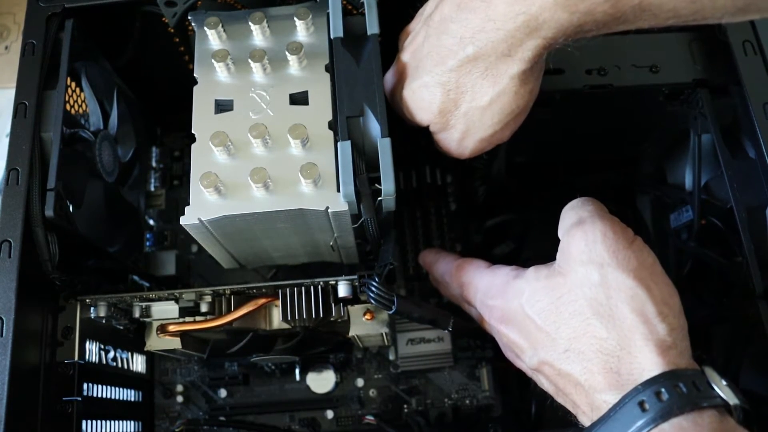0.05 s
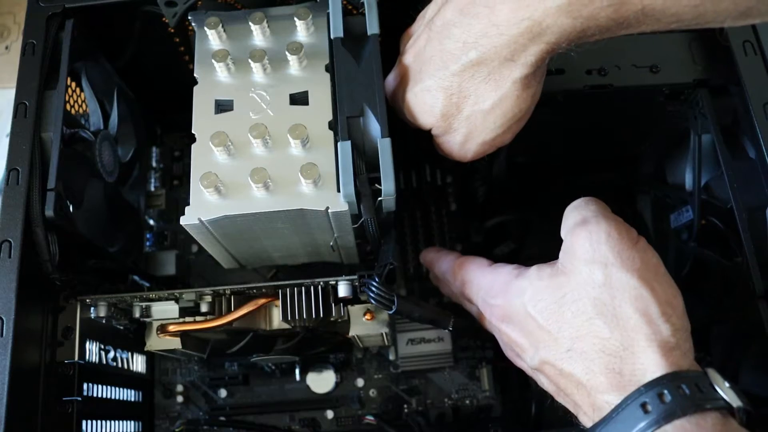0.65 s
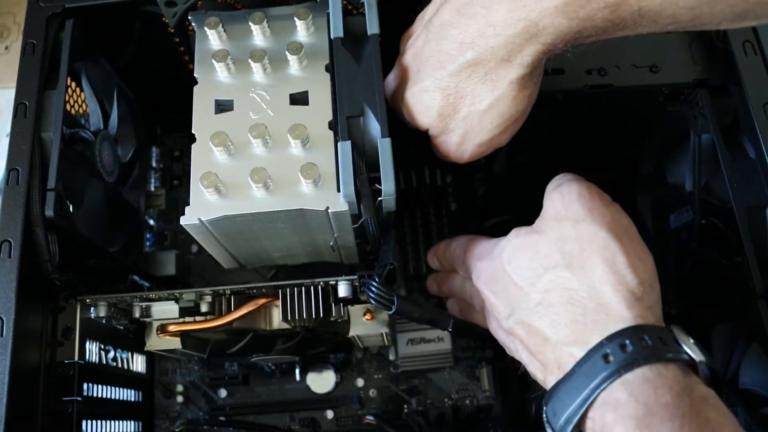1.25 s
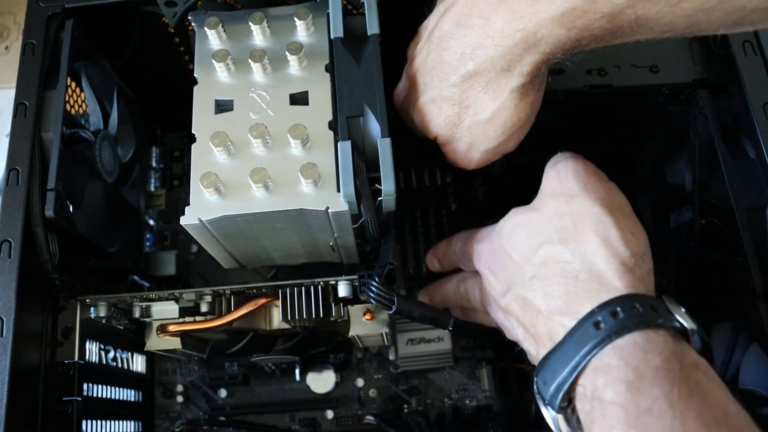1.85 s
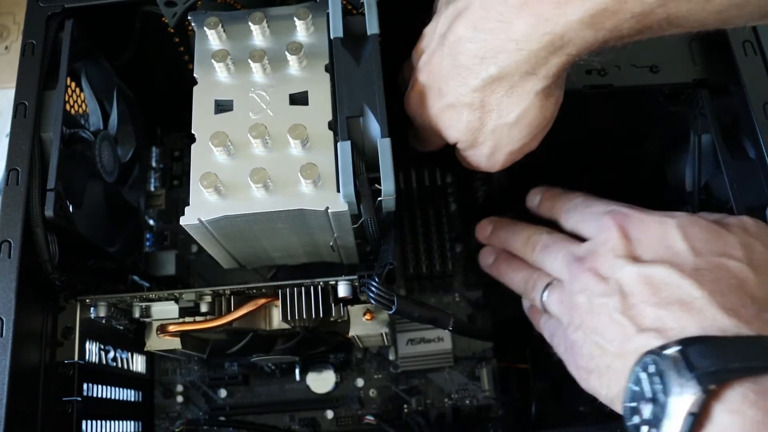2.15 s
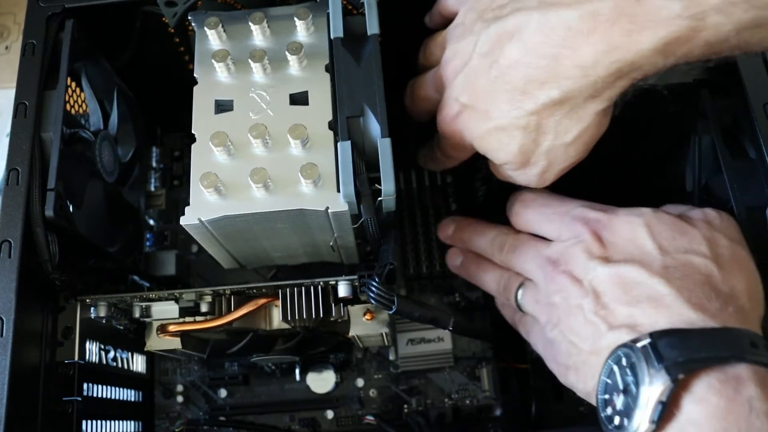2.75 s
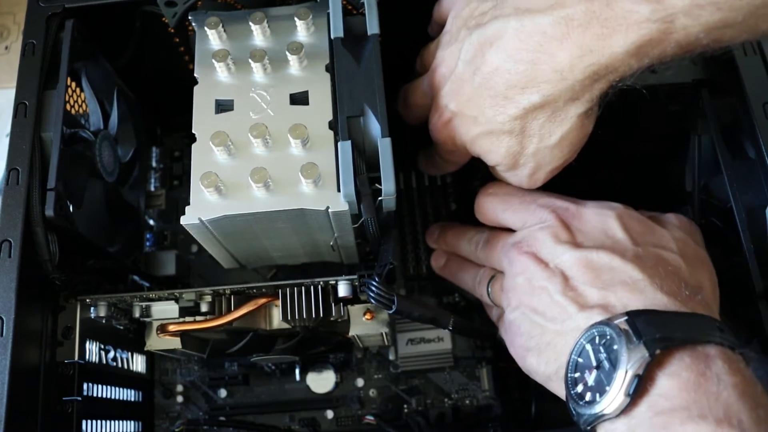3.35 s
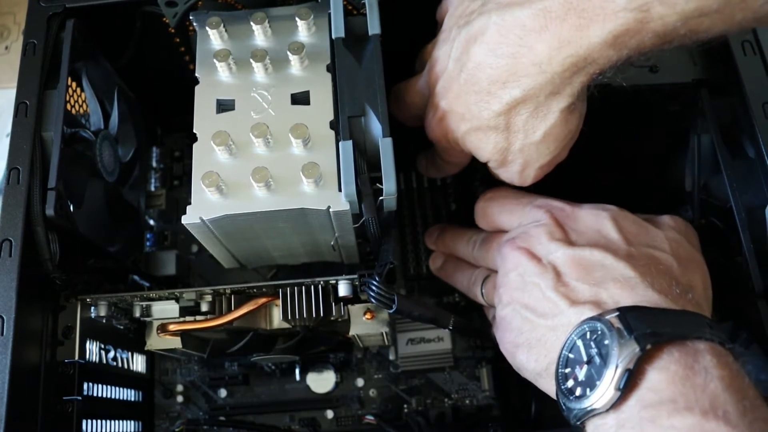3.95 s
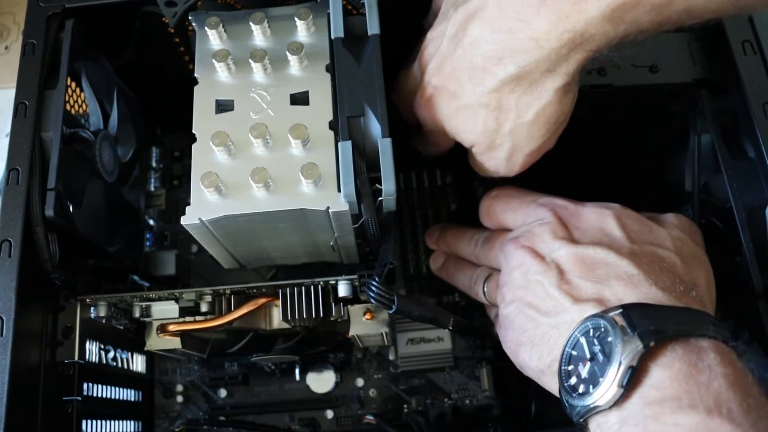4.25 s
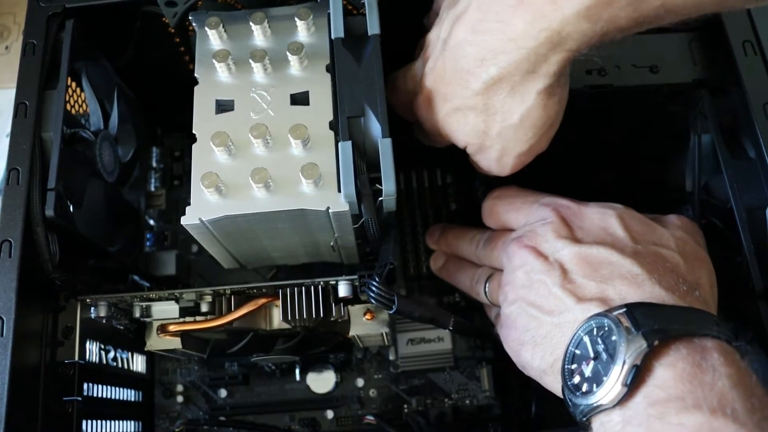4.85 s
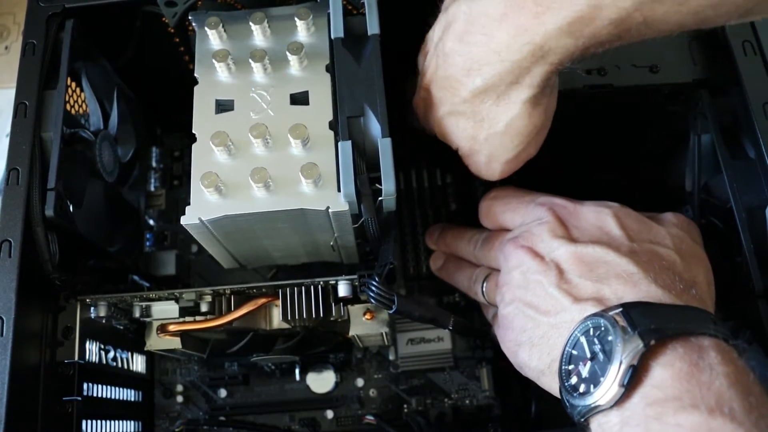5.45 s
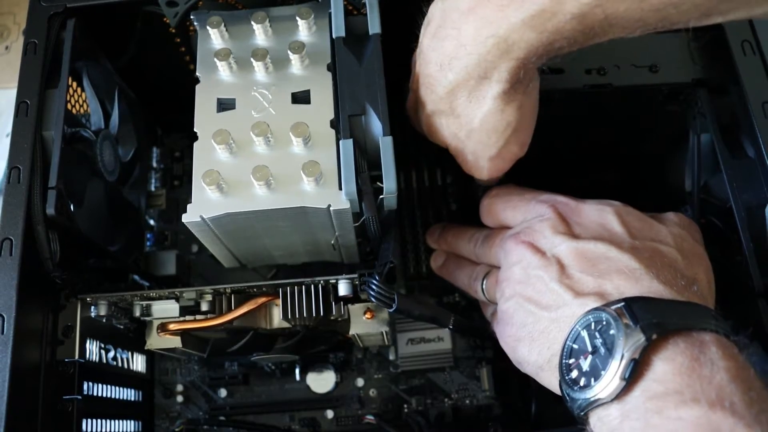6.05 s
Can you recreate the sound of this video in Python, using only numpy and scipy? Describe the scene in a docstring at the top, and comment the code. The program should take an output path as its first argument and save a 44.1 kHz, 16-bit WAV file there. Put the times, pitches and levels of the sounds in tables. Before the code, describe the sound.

Fingers work memory sticks into an open computer case, close to the microphone in a quiet, dry room with faint rumble and hiss. In the first half second, fingertips knock lightly and give tiny squeaks on the plastic. From 0.5 to 1.8 seconds the sticks grind down their guides in short crunches, each with a hollow knock from the board and steel chassis, strongest at about 0.5 and 1.65 seconds. A tap and a brief hand scuff come around 2.2 seconds. Soft skin rubbing and small plastic ticks run throughout. At 3.9 seconds a retaining clip snaps shut loudly, together with a short thud as the stick hits the bottom of its slot. Lighter knocks and ticks follow from about 5 seconds, and a second clip closes with a loud, sharp snap at about 6.2 seconds.

```python
"""Fingers seat memory sticks in an open computer case, close to a mono microphone in a quiet, dry room.
First fingertips knock and squeak on the sticks. From 0.5 to 1.8 s the sticks grind down their guides,
shaking the mainboard and the steel chassis. Skin rubs on plastic and small parts tick throughout.
At 3.9 s a retaining clip snaps shut and a stick hits the slot bottom.
More knocks and ticks follow; the second clip snaps at 6.2 s."""
import sys
import numpy as np
from scipy import signal
from scipy.fft import rfft, irfft
from scipy.io import wavfile
from scipy.ndimage import uniform_filter1d

SR = 44100
rng = np.random.default_rng(int(sys.argv[2]) if len(sys.argv) > 2 else 0)


def wav_out(sig):
    """Save sig, one row per channel (or a flat mono array), as 16-bit PCM at SR to the path in sys.argv[1]."""
    wavfile.write(sys.argv[1], SR, np.round(np.clip(np.atleast_2d(sig).T, -1, 1) * 32767).astype(np.int16))


N = 274302
T = np.arange(SR // 2) / SR  # time axis of one event [s]

# mainboard flexing on its posts: (frequency [Hz], level [dB], t60 [s])
BOARD_MODES = [(108, -12, 0.3), (129.4, -12, 0.19), (191.3, -3, 0.16), (250, -7, 0.049),
               (272.8, -5.5, 0.24), (341, 0, 0.097), (420, -4, 0.078), (432, -17, 0.18), (483, -4, 0.037)]
# steel chassis and cooler: (frequency [Hz], level [dB], t60 [s])
CHASSIS_MODES = [(566, -11, 0.17), (670, 7, 0.071), (753, 5, 0.11), (798, 0.5, 0.051), (879, -2.5, 0.11),
                 (949, -0.5, 0.068), (1124, -9, 0.057), (1230, -9, 0.15), (1320, -5.5, 0.048)]
# stick in its slot: (frequency [Hz], level [dB], t60 [s])
STICK_MODES = [(1577, -3, 0.044), (1710, -4.5, 0.021), (2093, -5.5, 0.12), (2483, -9.5, 0.027),
               (2670, 0, 0.023), (3000, -5, 0.022), (3150, -30, 0.042), (3390, 7.5, 0.018),
               (5200, 4, 0.0087), (7500, -16, 0.012)]
# plastic retaining clips: (frequency [Hz], level [dB], t60 [s])
FIRST_CLIP_MODES = [(1790, -15.5, 0.066), (1996, -15, 0.082), (2540, 0.5, 0.02), (3170, -0.5, 0.016),
                    (3890, -1, 0.019), (4850, -9.5, 0.029), (6550, 2, 0.011), (6760, 3.5, 0.015),
                    (7040, -2, 0.029), (7800, -26, .015), (8660, -5, .015), (9540, -23, 0.0079)]
SECOND_CLIP_MODES = [(440, -14, 0.035), (730, -6, 0.04), (1143, -6, .04), (1290, -8, 0.02),
                     (1720, -12, 0.049), (2600, 1, 0.016), (3000, 3, 0.03), (3740, -14, 0.029),
                     (4170, -0.5, 0.036), (4750, -1.5, 0.03), (5160, -1.5, 0.029), (6830, 3.5, 0.017),
                     (8020, -6, 0.023), (9200, 1, 0.0091)]

# crack of each clip: (frequency [Hz], level [dB])
FIRST_CRACK_SPECTRUM = [(300, -17), (900, -44), (1400, -8), (2000, 2.5), (3200, -1.5), (4400, -12),
                        (5500, -6.5), (7000, -7), (9500, -14.5), (12000, -18.5), (15500, -39)]
SECOND_CRACK_SPECTRUM = [(250, -30), (420, -11.5), (850, -24), (1150, 12.5), (1600, -7.5), (3000, -1),
                         (5200, -2.5), (8000, -7), (11000, -14), (15500, -22)]
# board thud, plastic scrape, skin hiss, finger drag, room tone: (frequency [Hz], level [dB])
THUD_SPECTRUM = [(70, -38), (110, -12), (300, 4), (450, -6), (1000, -6), (3000, -28), (12000, -75)]
SCRAPE_SPECTRUM = [(400, -34), (1200, 8), (2000, 3), (3100, 13.5), (4300, -1.5), (5500, -7.5), (8000, -7.5),
                   (11000, -21.5), (15000, -29)]
SKIN_SPECTRUM = [(500, -25), (1500, -12), (2300, -5.5), (2900, -2.5), (3250, -4.5), (3700, -7), (4400, -13),
                 (5400, -11), (8000, -35), (15000, -35)]
DRAG_SPECTRUM = [(100, -16), (350, -0.5), (550, -6.5), (850, -0.5), (1150, -9.5), (2200, -12), (4500, -22),
                 (8000, -24), (15000, -41)]
ROOM_SPECTRUM = [(12, -40), (20, -7), (59, 1), (153, -1.5), (268, 0.5), (431, -3.5), (586, -7.5),
                 (733, -7.5), (1840, -12.5), (3040, -13), (4250, -18), (5320, -18.5), (14500, -24.5),
                 (15800, -27.5)]

# stick grinds deeper: (hardest slip [s], rise [s], fall [s], board level [dB], chassis level [dB],
# plastic level [dB], board resonance at that spot [Hz])
PRESSES = [(.508, 0.0034, 0.0065, -22, -32.5, -38, 342), (1.221, 0.0046, 0.0063, -32, -30.5, -39, 190),
           (1.242, .003, 0.0094, -37, -33.5, -40.5, 168), (1.266, 0.0027, 0.011, -32.5, -34.5, -44, 280),
           (1.639, 0.0038, 0.014, -26.5, -31.5, -39, 180), (1.663, 0.0074, 0.01, -25.5, -24.5, -35, 405),
           (1.822, 0.0024, 0.0035, -31.5, -42, -37, 193)]
# clip snaps over: (time [s], ring level [dB], crack level [dB], crack decay [s])
SNAPS = [(3.913, -16, -17.5, 0.0043), (6.1968, -14.5, -15, 0.0042)]
# stick hits the slot bottom: (time [s], board level [dB], chassis level [dB])
SEATINGS = [(3.9145, -13, -18), (3.926, -28, -41), (6.1975, -44.5, -28.5)]
# finger lands on a stick: (time [s], board level [dB], chassis level [dB], plastic level [dB])
KNOCKS = [(.071, -45, -42, -48), (.168, -60, -46.5, -60), (.340, -41, -48, -47), (.411, -38, -36, -52),
          (2.196, -43, -42, -49), (2.957, -65, -48, -55.5), (4.985, -46.5, -51, -48.5),
          (5.168, -45, -51.5, -49.5), (5.321, -41.5, -46.5, -46.5), (6.048, -45, -42, -38),
          (6.087, -51, -50, -49.5)]
# plastic ticks on plastic: (time [s], level [dB], pitch [Hz])
TICKS = [(.357, -44, 3300), (0.392, -47.5, 3500), (.511, -35, 5500), (1.179, -49.5, 3180),
         (1.358, -53, 2400), (1.417, -53, 7100), (1.616, -45.5, 2900), (1.810, -39, 3620),
         (2.104, -43, 2880), (2.195, -37, 1920), (3.170, -53, 8160), (3.499, -49, 3480),
         (3.603, -54.5, 3300), (3.892, -46, 4040), (4.836, -51.5, 7500), (4.982, -46, 7900),
         (5.23, -44, 2020), (5.461, -43.5, 1900), (5.534, -38, 2050), (5.780, -49, 2880),
         (5.834, -49.5, 2950), (5.876, -45.5, 2550), (5.996, -45.5, 2340)]
# fingertip catches: (time [s], length [s], level [dB], pitch [Hz])
SQUEAKS = [(0.244, 0.022, -52.5, 2630), (0.308, 0.031, -51, 2640), (0.337, 0.013, -51, 2630),
           (.355, 0.017, -45, 2610), (0.356, 0.01, -47, 3580), (0.485, 0.028, -47, 2780),
           (0.505, 0.011, -33.5, 2605), (0.706, 0.052, -52, 1060)]
# side of a hand scuffs the case: (time [s], length [s], level [dB], pitch [Hz])
SCUFFS = [(2.256, .12, -39.5, 850), (4.299, 0.063, -49, 1450)]
# fingertip strokes the sticks: (time [s], length [s], hiss level [dB])
STROKES = [(0.054, 0.18, -52.5), (.31, 0.23, -56.5), (0.781, 0.26, -59.5), (1.349, 0.23, -55),
           (2.014, .18, -53.5), (2.225, 0.19, -61), (2.377, 0.24, -58), (2.609, 0.12, -57),
           (2.823, 0.25, -63), (3.083, 0.18, -53.5), (3.627, 0.19, -52), (4.132, .18, -54.5),
           (4.314, 0.11, -55), (4.423, 0.18, -56), (4.712, .13, -51), (5.08, 0.11, -53.5),
           (5.279, 0.15, -51.5), (5.531, 0.086, -56)]
# hand pressure on the sticks: (time [s], drag level at full stroke speed [dB])
PRESSURE = [(0, -59), (.35, -51), (.7, -58.5), (1.15, -44), (1.42, -47.5), (1.93, -54), (2.08, -46),
            (2.32, -46.5), (2.65, -57), (3.0, -59), (3.12, -52.5), (3.45, -60), (3.7, -51.5), (4.15, -62.5),
            (4.65, -67), (4.95, -52.5), (5.8, -59), (6.1, -45)]

SCRAPE_LEAD_S, CHASSIS_LAG_S = 0.003, 0.00196  # plastic scrapes, board gives, chassis follows
FLEX_HZ, FLEX_WIDTH_HZ, FLEX_DB = 114, 63, -15.5  # whole board bends; dB re thump
KNOCK_SLIDE_S, KNOCK_SPOT_HZ = 0.0062, 318
TAP_HZ, TAP_WIDTH_HZ, TAP_DB = 1220, 290, -9  # hollow tap of the stick; dB re chassis
FAINT_TICKS_PER_S, FAINT_TICK_DB, FAINT_TICK_HZ = 2, -56, 6000
CREEP_SPEED_RATIO, CREEP_HISS_DB = 0.42, -20  # between strokes: speed re full stroke, hiss re drag
BOARD_DAMP_S, CLIP_DAMP_S = 0.088, 0.023  # time constants of damping by the hands
ROOM_TONE_DB, LOWPASS_HZ = -54, 15800


def presses(board, chassis, plastic):
    """A stick crunches down its guides, flexing the board and shaking the chassis."""
    out = np.zeros(N)
    peak_s = 0.1
    for s, rise_s, fall_s, board_db, chassis_db, plastic_db, spot_hz in PRESSES:
        start_s = s - peak_s
        thump = through(slide_force(rise_s, fall_s, peak_s, spread_db=5), board)
        shake = through(slide_force(rise_s, fall_s, peak_s, spread_db=4.5), chassis)
        add(out, start_s, band(thump, spot_hz, 0.5 * spot_hz), board_db)
        add(out, start_s, double_band(thump, FLEX_HZ, FLEX_WIDTH_HZ), board_db + FLEX_DB)
        add(out, start_s + CHASSIS_LAG_S, band(shake, hz=850, width_hz=870), chassis_db)
        scrape_times_s = (rise_s + SCRAPE_LEAD_S, fall_s + SCRAPE_LEAD_S, peak_s)
        crunch = through(slide_force(*scrape_times_s, spread_db=6.5), plastic)
        grit = band(slide_force(*scrape_times_s, spread_db=14), hz=6460, width_hz=4000)
        grit = band(grit, hz=6500, width_hz=6000)
        add(out, start_s - SCRAPE_LEAD_S, unit(crunch) + undb(-15) * unit(grit), plastic_db)
    return out


def snaps():
    """Each clip flips over its catch, rings and chatters for a few milliseconds."""
    out = np.zeros(N)
    clips = [(FIRST_CLIP_MODES, FIRST_CRACK_SPECTRUM), (SECOND_CLIP_MODES, SECOND_CRACK_SPECTRUM)]
    for (s, ring_db, crack_db, decay_s), (modes, spectrum) in zip(SNAPS, clips):
        add(out, s, ring(modes) * np.exp(-T / CLIP_DAMP_S), ring_db)
        chatter = grains(len(T), spread_db=2.5) * np.exp(-T / decay_s)
        add(out, s, through(chatter, colour(spectrum)), crack_db)
    return out


def seatings(board, chassis):
    """The freed stick hits the slot bottom: the board thuds, the chassis rings."""
    out = np.zeros(N)
    thud = band(board + undb(-1) * colour(THUD_SPECTRUM), hz=274, width_hz=260)
    for s, board_db, chassis_db in SEATINGS:
        add(out, s, thud, board_db)
        add(out, s, chassis, chassis_db)
    return out


def knocks(board, chassis, plastic):
    """A landing finger thumps the board, rings the chassis, crackles in the slot and taps the stick."""
    out = np.zeros(N)
    for s, board_db, chassis_db, plastic_db in KNOCKS:
        thump = through(touch_force(KNOCK_SLIDE_S, slip_ratio=0.83), board)
        shake = through(touch_force(KNOCK_SLIDE_S, slip_ratio=1.17), chassis)
        crackle = through(touch_force(KNOCK_SLIDE_S, slip_ratio=4.2, spread_db=17), plastic)
        tap = double_band(touch_force(KNOCK_SLIDE_S, slip_ratio=2.3), TAP_HZ, TAP_WIDTH_HZ)
        add(out, s, band(thump, KNOCK_SPOT_HZ, 0.66 * KNOCK_SPOT_HZ), board_db)
        add(out, s, band(shake, hz=800, width_hz=630), chassis_db)
        add(out, s, crackle, plastic_db)
        add(out, s, tap, chassis_db + TAP_DB)
    return out


def ticks(plastic):
    """Touches too light to move the board, each at its own pitch; fainter ones fall at random."""
    out = np.zeros(N)
    draws = rng.random((int(FAINT_TICKS_PER_S * N / SR), 2))
    faint = [(when * N / SR, FAINT_TICK_DB, FAINT_TICK_HZ * 2 ** (pitch - 0.5)) for when, pitch in draws]
    for s, db, hz in TICKS + faint:
        touch = through(touch_force(slide_s=0.0058, slip_ratio=2.3), plastic)
        add(out, s, double_band(touch, hz, width_hz=0.7 * hz) + undb(-6) * touch, db)
    return out


def squeaks():
    """A fingertip catches: short runs of stick-slip with unsteady pitch."""
    out = np.zeros(N)
    for s, length_s, db, hz in SQUEAKS:
        count = int(length_s * SR)
        pitch_hz = hz * (1 + 0.054 * wander(rate_hz=840)[:count])
        phase = 2 * np.pi * np.cumsum(pitch_hz) / SR
        add(out, s, np.sin(phase) * np.hanning(count), db)
    return out


def scuffs():
    """The side of a hand brushes the case: hollow rubs that swell and fade."""
    out = np.zeros(N)
    for s, length_s, db, hz in SCUFFS:
        count = int(length_s * SR)
        rub = grains(count, spread_db=6) * np.hanning(count)
        add(out, s, double_band(rub, hz, width_hz=0.34 * hz), db)
    return out


def rubbing(board, chassis):
    """Skin hisses over the sticks; drag grows with speed and pressure and stirs the case."""
    t = np.arange(N) / SR
    pressure = undb(np.interp(t, *np.transpose(PRESSURE)))
    speed = np.full(N, CREEP_SPEED_RATIO)
    hiss_gain = undb(CREEP_HISS_DB) * CREEP_SPEED_RATIO * pressure
    for s, length_s, hiss_db in STROKES:
        progress = np.clip((t - s) / length_s, 0, 1)
        stroke_speed = np.sin(np.pi * progress ** 0.51)  # quick start, gradual stop
        hiss_gain = np.maximum(hiss_gain, undb(hiss_db) * stroke_speed)
        speed = np.maximum(speed, stroke_speed)
    hiss = hiss_gain * grains(N, spread_db=7) * undb(2.5 * wander(rate_hz=60))
    drag = pressure * speed * grains(N, spread_db=6) * undb(1.9 * wander(rate_hz=70))
    skin = colour(SKIN_SPECTRUM)
    rasp = unit(skin + band(skin, hz=3340, width_hz=790))
    body = unit(colour(DRAG_SPECTRUM) + undb(-4.5) * chassis + undb(-5) * board)
    return through(hiss, rasp) + through(drag, body)


def echoes(low_t60_s, high_t60_s, gap_s, db):
    """Impulse response of dense reflections that build up after a gap; treble dies first."""
    noise = rng.standard_normal(len(T))
    low = signal.lfilter(*signal.butter(1, 3000, fs=SR), noise)
    tail = low * decay(low_t60_s) + (noise - low) * decay(high_t60_s)
    onset = np.clip(T / gap_s - 1, 0, 1)
    return undb(db) * unit(tail * onset)


def room_tone():
    """Distant house rumble and steady fine hiss."""
    return undb(ROOM_TONE_DB) * through(rng.standard_normal(N), colour(ROOM_SPECTRUM))


def slide_force(rise_s, fall_s, peak_s, spread_db):
    """Grinding slide: slips grow to the hardest one at peak_s, then die."""
    age_s = T - peak_s
    envelope = np.exp(np.minimum(age_s / rise_s, -age_s / fall_s))
    force = unit(grains(len(T), spread_db) * envelope)
    force[int(peak_s * SR)] += 0.35
    return force


def touch_force(slide_s, slip_ratio, spread_db=5):
    """One touch: a blow, then a stutter of slips that swells and dies."""
    age = T / slide_s
    force = slip_ratio * unit(grains(len(T), spread_db) * age ** 0.18 * np.exp(-age))
    force[0] += 1
    return force


def grains(count, spread_db):
    """Dense micro-slips of uneven size, rms 1."""
    slips = rng.standard_normal(count) * undb(spread_db * rng.standard_normal(count))
    return slips / np.std(slips)


def wander(rate_hz):
    """Smooth random drift, spread near 1."""
    step = int(SR / rate_hz)
    return uniform_filter1d(np.repeat(rng.standard_normal(N // step + 1), step), step)[:N]


def ring(modes):
    """Damped modes; neighbours swing in opposite directions at the microphone."""
    return unit(sum((-1) ** k * undb(db) * np.sin(2 * np.pi * hz * T) * decay(t60_s)
                    for k, (hz, db, t60_s) in enumerate(modes)))


def decay(t60_s):
    """Envelope falling 60 dB in t60_s."""
    return np.exp(-np.log(1000) * T / t60_s)


def colour(spectrum):
    """Minimum-phase impulse response with the given spectral shape."""
    hz, db = np.transpose(spectrum)
    bins_hz = np.fft.rfftfreq(len(T), 1 / SR)
    gain = undb(np.interp(np.log(bins_hz + 1), np.log(hz), db))
    cepstrum = irfft(np.log(gain))
    cepstrum[1:len(T) // 2] *= 2
    cepstrum[len(T) // 2:] = 0
    return unit(irfft(np.exp(rfft(cepstrum))))


def band(x, hz, width_hz):
    """One resonance, gain 1 at its centre."""
    return signal.lfilter(*signal.iirpeak(hz, hz / min(width_hz, SR / 3), fs=SR), x)


def double_band(x, hz, width_hz):
    """Two equal resonances in series."""
    return band(band(x, hz, width_hz), hz, width_hz)


def through(x, response):
    """Convolve, keeping the length."""
    return signal.fftconvolve(x, response)[:len(x)]


def add(track, s, sound, db):
    """Mix in at time s; db is the level if all the energy fell within 10 ms."""
    start = int(s * SR)
    track[start:start + len(sound)] += (undb(db) * np.sqrt(SR / 100) * unit(sound))[:N - start]


def unit(x):
    """Scale to energy 1."""
    return x / np.sqrt(np.sum(x ** 2))


def undb(db):
    """Decibels to gain."""
    return 10 ** (np.asarray(db) / 20)


def scene():
    """All contacts, their reflections from case and room, and room tone; two equal channels."""
    board = unit(ring(BOARD_MODES) * np.exp(-T / BOARD_DAMP_S) + undb(-1) * colour(THUD_SPECTRUM))
    chassis = ring(CHASSIS_MODES)
    plastic = unit(undb(-5) * ring(STICK_MODES) + colour(SCRAPE_SPECTRUM))
    direct = presses(board, chassis, plastic) + knocks(board, chassis, plastic)
    direct += ticks(plastic) + squeaks() + scuffs()
    direct += snaps() + seatings(board, chassis) + rubbing(board, chassis)
    # the small board radiates no deep bass
    direct = signal.sosfilt(signal.butter(3, 85, "high", fs=SR, output="sos"), direct)
    case = echoes(low_t60_s=0.098, high_t60_s=0.028, gap_s=0.0023, db=-14.5)
    room = echoes(low_t60_s=0.34, high_t60_s=0.17, gap_s=0.009, db=-19)
    mono = direct + through(direct, case + room) + room_tone()
    return np.array([mono, mono])


def record(dry):
    """Soft peak limiting, faint hiss per channel, steep low-pass."""
    ceiling = 1.3
    limited = ceiling * np.tanh(dry / ceiling)
    hiss = undb(-72.5) * rng.standard_normal(dry.shape)
    return signal.sosfilt(signal.ellip(8, 0.2, 70, LOWPASS_HZ, fs=SR, output="sos"), limited + hiss)


dry = scene()
out = record(dry)
wav_out(out)
```